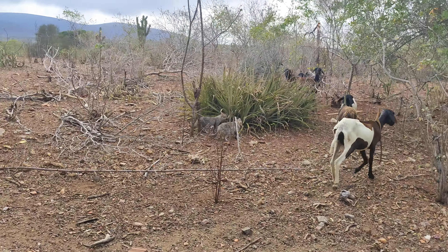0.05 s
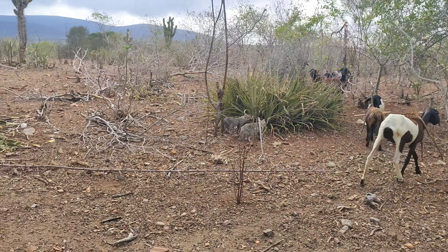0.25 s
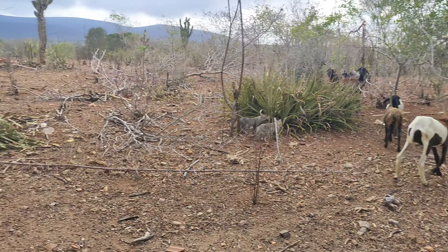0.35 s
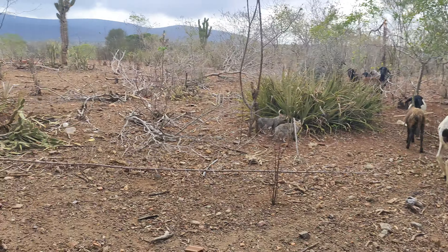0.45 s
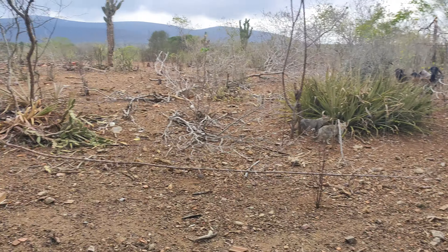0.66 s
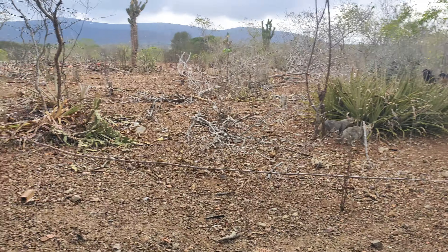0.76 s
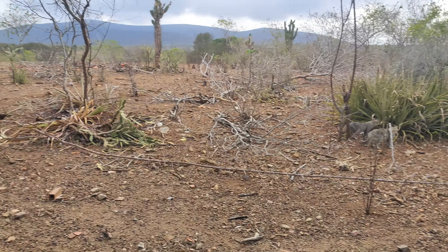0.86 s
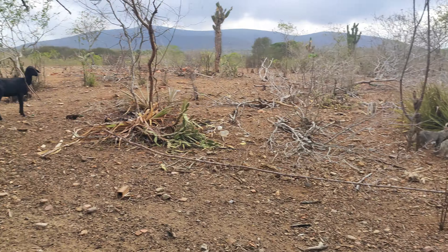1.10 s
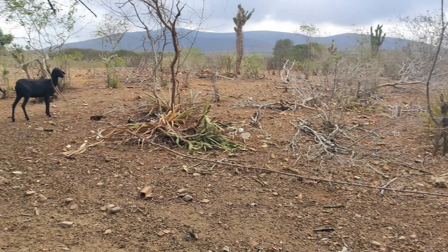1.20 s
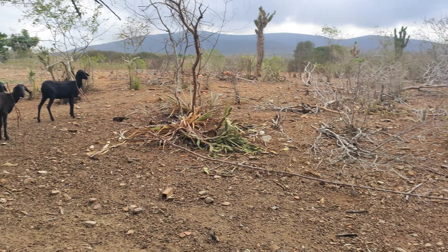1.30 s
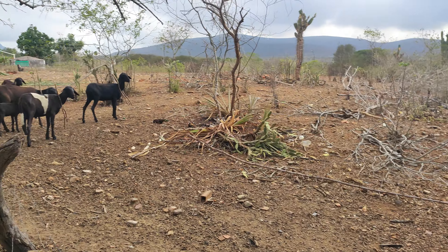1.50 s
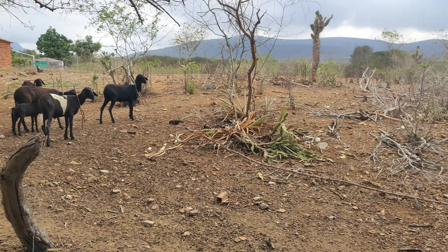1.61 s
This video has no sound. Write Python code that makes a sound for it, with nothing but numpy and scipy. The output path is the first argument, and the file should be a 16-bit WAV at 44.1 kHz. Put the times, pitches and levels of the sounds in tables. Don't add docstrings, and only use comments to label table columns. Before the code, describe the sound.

A sheep bleats once, humming then hoarse and trembling, followed by a short grunt in dry scrub

```python
import sys
import numpy as np
from scipy import signal
from scipy.fft import rfft, irfft, next_fast_len
from scipy.io import wavfile
from scipy.ndimage import uniform_filter1d, map_coordinates

SR = 44100
rng = np.random.default_rng(int(sys.argv[2]) if len(sys.argv) > 2 else 0)


def gain_from_decibels(decibels):
    exponent = np.asarray(decibels, float) / 20
    return 10 ** exponent


def unload_audio(sound):
    columns = np.transpose(np.atleast_2d(sound))
    steps = np.round(np.clip(columns, -1, 1) * 32767)
    wavfile.write(sys.argv[1], SR, steps.astype(np.int16))


N = 72765


def unit(x):
    return x / np.sqrt(np.mean(x ** 2) + 1e-20)


def along(points, hz):
    f, v = np.transpose(points)
    return np.interp(np.log(hz + 1), np.log(f + 1), v)


def curves(rows):
    s, *cols = np.transpose(rows)
    return [np.interp(np.arange(N) / SR, s, c) for c in cols]


def wobble(rate):
    knots = rng.standard_normal(int(N * 400 / SR) + 4)
    return map_coordinates(knots, [np.arange(N) * min(rate, 400) / SR])


def filtered(x, response):
    m = next_fast_len(N + SR // 2)
    return irfft(rfft(x, m) * response(np.fft.rfftfreq(m, 1 / SR)), m)[..., :N]


def noise(spectrum, channels=1):
    white = rng.standard_normal((channels, N))
    return unit(filtered(white, lambda hz: gain_from_decibels(along(spectrum, hz))))


# t/s, level/dB
STIR = [(0.0, -62.5), (0.064, -78), (0.1, -54.5), (0.182, -68), (0.376, -68), (0.412, -54.5), (.47, -60.5),
        (.53, -56.5), (0.62, -66.5), (.72, -57.5), (0.8, -54), (0.82, -50), (0.89, -60), (1.0, -63.5),
        (1.1, -56.5), (1.236, -61.5), (1.282, -67.5), (1.65, -70)]
# f/Hz, level/dB per Hz
LITTER_SPECTRUM = [(300, -23), (1000, -49), (2500, 7), (4500, 9), (7600, -98), (8900, 12), (12000, 7),
                   (16000, -1)]
# t/s, peak level/dB, f/Hz, t60/s
TWIG_SNAPS = [
    (.092, -53, 750, .15),
    (.0967, -44, 10000, .04),
    (.136, -32, 1500, .015),
    (.339, -38, 8000, .005),
    (.49, -47, 11000, .15),
    (.809, -43, 11000, .01),
    (.827, -38, 14000, .012),
    (1.515, -54, 1100, .15),
    (1.633, -50, 12000, .006),
]


def litter():
    grains_per_s, grain_spread_db, grain_db = 300, 4.5, -11
    stir_db, = curves(STIR)
    grains = rng.random(N) < grains_per_s / SR
    impacts = grains * gain_from_decibels(grain_spread_db * rng.exponential(size=N).clip(0, 3))
    crackle = unit(signal.lfilter([1], [1, -.97], impacts * noise(LITTER_SPECTRUM)[0]))
    stir = gain_from_decibels(stir_db + 2.5 + 2.8 * wobble(29.913))
    hiss = 0.29 * noise(LITTER_SPECTRUM) + 0.71 * noise(LITTER_SPECTRUM, channels=2)
    out = stir * (hiss + gain_from_decibels(grain_db) * crackle)
    t = np.arange(SR // 10) / SR
    for s, db, hz, t60 in TWIG_SNAPS:
        band = signal.butter(2, [hz * .55, min(hz * 1.6, 20000)], "bandpass", fs=SR)
        burst = unit(signal.lfilter(*band, rng.standard_normal(len(t))))
        snap = gain_from_decibels(db - 5 - 60 * t / t60) * burst
        start = round(s * SR)
        out[:, start:][:, :len(t)] += snap[:N - start]
    return out


# t/s, level/dB
SCRUB_HISS = [(0.0, -73), (.2, -73), (.942, -66), (1.2, -70.5), (1.26, -75), (1.32, -75), (1.42, -76.5),
              (1.48, -78.5), (1.53, -72.5), (1.65, -75)]
# f/Hz, level/dB per Hz
SCRUB_SPECTRUM = [(60, -0.5), (250, 0.5), (700, -12.5), (1400, -7), (2300, 3.5), (3200, -12.5), (5000, -14),
                  (8000, -27.5)]
# t/s, level/dB
BUFFETING = [(0.0, -50), (0.05, -57), (0.766, -55), (0.826, -120), (0.896, -50), (0.922, -82),
             (1.65, -62.5)]
# f/Hz, level/dB per Hz
RUMBLE_SPECTRUM = [(15, -3), (40, 0.5), (90, -1), (200, -20.5), (500, -49)]


def air():
    hiss_db, = curves(SCRUB_HISS)
    wind_db, = curves(BUFFETING)
    port_db = np.array([[0], [-4]])
    lumps = gain_from_decibels(wind_db + port_db + 4 * np.array([wobble(14), wobble(14)]))
    far = gain_from_decibels(hiss_db + 14 + 1.5 * wobble(12)) * noise(SCRUB_SPECTRUM, channels=2)
    return far + lumps * noise(RUMBLE_SPECTRUM, channels=2)


# t/s, length/s, from f/Hz, to f/Hz, level/dB
WHISTLES = [
    (0, 0.082, 2525, 2300, -59.5),
    (0.088, 0.11, 2042, 2163, -58.5),
    (.2, .1, 3250, 2610, -64),
    (.28, 0.057, 2217, 2536, -59),
    (0.312, .09, 2496, 2330, -57),
    (1.188, 0.1057, 2364, 2198, -65),
    (1.196, 0.065, 1980, 1860, -70),
    (1.297, 0.126, 2300, 2140, -62.5),
    (1.581, 0.17, 2384, 2415, -65.5),
]


def birds():
    out, t = np.zeros(N), np.arange(N) / SR
    for s, length, from_hz, to_hz, db in WHISTLES:
        u = ((t - s) / length).clip(0, 1)
        glide = (from_hz + (to_hz - from_hz) * u) * (1 + .015 * wobble(150))
        envelope = np.sqrt(np.sin(np.pi * u).clip(0))
        level = gain_from_decibels(db + 1.5 + 1.9 * wobble(110).clip(-2, 2))
        out += level * envelope * np.sin(2 * np.pi * np.cumsum(glide) / SR)
    return out


def folds(pitch_hz, rough):
    tremor, jitter, scatter_db, breath_db = .005, .11, 1.5, 1
    flap_hz, flap_depth = 52, .9
    double_from_s, double_to_s, double_depth = .435, .575, .4
    overtone_db = -17.5
    t = np.arange(N) / SR
    unsteady = 1 + tremor * wobble(60) + jitter * rough * wobble(150).clip(-2, 2)
    cycles = np.cumsum(pitch_hz * unsteady) / SR
    flap_phase = 2 * np.pi * np.cumsum(flap_hz * (1 + 0.2093 * wobble(16))) / SR
    flap = 1 + flap_depth * rough * np.sin(flap_phase)
    doubling = (t > double_from_s) & (t < double_to_s)
    flap = flap * (1 + double_depth * doubling * np.cos(np.pi * cycles))

    at = np.interp(np.arange(1, int(cycles[-1])), cycles, np.arange(N))
    i = at.astype(int)
    scatter = gain_from_decibels(scatter_db * rough[i] * rng.standard_normal(2000)[:len(i)])
    size = np.sqrt(flap[i]) * scatter * np.sqrt(SR / pitch_hz[i])
    taps = i[:, None] + np.arange(-8, 9)
    offset = taps - at[:, None]
    shape = np.sinc(offset) * np.cos(offset * np.pi / 18) ** 2
    puffs = np.bincount(taps.clip(0, N - 1).ravel(), (shape * size[:, None]).ravel(), N)

    breath = rng.standard_normal(N) * np.sqrt(flap) * 2 * np.exp(-1.5 * (cycles % 1))
    swing = flap * (np.sin(2 * np.pi * cycles) + gain_from_decibels(overtone_db) * np.cos(4 * np.pi * cycles))
    return -(puffs * (1 - 0.65 * rough) + gain_from_decibels(breath_db) * (0.14 + rough) * breath), swing


def sounding(effort_db):
    return gain_from_decibels(effort_db) * (effort_db > effort_db.min() + .1)


def throat(x, tract, low_hz, turn=-1):
    top_hz = 2810

    def response(f):
        peaks = 0
        for k, (centre, width, db) in enumerate(tract):
            damping = 1j * f * width
            peaks = peaks + turn ** k * gain_from_decibels(db) * damping / (centre * centre - f * f + damping)
        low_edge = (1j * f / (low_hz + 1j * f)) ** 2
        return peaks * low_edge / (1 + 1.2j * f / top_hz - (f / top_hz) ** 2) ** 2

    return filtered(x, response)


# t/s, pitch f/Hz, effort level/dB, roughness/0-1, mouth/0 shut-1 open
NASAL_HUM = [(.203, 171.7, -89, 0.09, .2), (.215, 173.1, -44, 0.22, 0), (.244, 150, -44, 0.22, 0),
             (.282, 149.7, -51.5, 0.23, 0.04), (.31, 181.1, -46, 0.03, 0), (.385, 205.8, -39, 0.1, 0.03),
             (.398, 224.5, -41, 0.14, 0), (.405, 262.2, -40.5, 0.38, 0.2), (.418, 254.2, -40, 0.42, 0.06),
             (.44, 299.1, -45.5, .4, 0.23), (.452, 218.5, -39, .35, 0.13), (.49, 217.7, -40, 0.38, 0.04),
             (.515, 219, -38.5, 0.4, 0.15), (.578, 216, -38.5, 0.15, 0.1)]
# t/s, pitch f/Hz, effort level/dB, roughness/0-1, mouth/0 shut-1 open
HOARSE_CRY = [(0.585, 214.8, -36.5, 0.1, 0.52), (.617, 233.4, -37.5, 0, 0.22), (.621, 263, -41.5, .7, 0.84),
              (.654, 280, -41.5, 0.52, 1), (.657, 286.2, -33.5, 0.16, 0.92), (.668, 274.2, -39, 0.13, 1),
              (0.679, 280, -35, 0.2, 1), (.698, 276, -35, 0.2, 1), (.71, 263.8, -35.5, .12, 1),
              (.734, 269.3, -38, 0.14, 1), (.756, 294.6, -33.5, .08, 1), (.766, 291.9, -38, 0.68, 1),
              (.795, 280.2, -35.5, 0.7, 0.98), (0.806, 275.6, -41.5, 0.58, 1),
              (.822, 276.2, -37.5, 0.63, 1), (.85, 285.3, -37, 0.56, 0.99)]
# t/s, pitch f/Hz, effort level/dB, roughness/0-1, mouth/0 shut-1 open-2 wide
TREMBLING_END = [(.862, 303.3, -37.5, .1, 0.63), (.882, 293.9, -37.5, 0.048, 1.04),
                 (.892, 279.6, -36.5, 0.047, 1.27), (.928, 264.1, -36.5, 0.024, 1.61),
                 (.953, 243.3, -36, .01, 2.03), (.976, 254.4, -38, .02, 1.5),
                 (1.002, 253.6, -37.5, .02, 1.95), (1.03, 264.7, -36, 0.032, 1.85),
                 (1.049, 259.6, -37.5, 0.032, 1.8), (1.069, 241.4, -36.5, .03, 1.64),
                 (1.084, 241.4, -36.5, 0.022, 1.65), (1.104, 247, -39, 0.012, 1.6),
                 (1.12, 234.2, -35.5, 0.099, 1.8), (1.134, 215.1, -37, .2, 2),
                 (1.155, 175.8, -39.5, 0.1, 2.1), (1.161, 168, -42, 0.24, 0),
                 (1.19, 163.3, -59.5, 0.45, 0.33), (1.205, 157, -94, 0.45, 0)]
# f/Hz, width/Hz, level/dB
NOSE_TRACT = [(775, 180, -7.5), (1316, 243, -12), (1880, 240, -19)]
# f/Hz, width/Hz, level/dB
MOUTH_TRACT = [(775, 95, 4), (1430, 260, -6), (1997, 276, -4), (2300, 220, -2.5), (3520, 330, -32)]
# f/Hz, width/Hz, level/dB
WIDE_TRACT = [(747.6, 111, 1), (990, 392, -23), (2000, 290, -5.5), (2272, 215, -2), (3430, 230, -15.5)]
# f/Hz, width/Hz, level/dB
LIPS_TRACT = [(660, 120, 0.5), (1320, 400, 2), (2230, 200, -13)]


def bleat():
    tract_low_hz = 378
    part_from_s, part_to_s, part_db = 0.5904, .619, 17.5
    chest_db, chest_open_db = 6.5, -5
    valley_hz, valley_wide_hz, valley_db = 1380, 150, -1.5
    dip_hz, dip_wide, dip_depth = 450, .6, .08
    body_low_hz = 135

    pitch, effort_db, rough, mouth = curves(NASAL_HUM + HOARSE_CRY + TREMBLING_END)
    t = np.arange(N) / SR
    puffs, swing = sounding(effort_db) * folds(pitch, rough.clip(0, 1))
    part = np.clip(np.minimum(t - part_from_s, part_to_s - t) / .003, 0, 1)
    parting = gain_from_decibels(part_db) * throat(puffs * part, LIPS_TRACT, tract_low_hz, turn=0.97)
    puffs = puffs * (1 - part)
    chest = swing * gain_from_decibels(chest_db + (chest_open_db - chest_db) * mouth.clip(0, 1))
    ways = 0
    for k, tract in enumerate([NOSE_TRACT, MOUTH_TRACT, WIDE_TRACT]):
        share = (1 - abs(mouth - k)).clip(0)
        ways = ways + gain_from_decibels(20) * throat(puffs * share, tract, tract_low_hz)

    def radiation(f):
        valley = gain_from_decibels(valley_db * np.exp(-((f - valley_hz) / valley_wide_hz) ** 2))
        stiffness, damping = dip_hz ** 2 - f * f, 1j * f * dip_hz * dip_wide
        dip = (stiffness + damping * dip_depth) / (stiffness + damping)
        return dip * valley * f ** 4 / (f ** 4 + body_low_hz ** 4.0)

    return filtered(chest + ways - parting, radiation)


# t/s, pitch f/Hz, effort level/dB, roughness/0-1
COUGHS = [
    [(1.338, 198, -71.5, 0.2), (1.343, 247, -45.5, 0.06), (1.35, 326, -51.5, 0), (1.357, 477, -49, 0.1),
     (1.366, 455, -45.5, 0.38), (1.378, 393, -53.5, .5), (1.38, 400, -65, 0.44)],
    [(1.378, 332, -64.5, 0.08), (1.381, 335, -59, 0), (1.3865, 333.5, -40, 0.06), (1.3875, 219.6, -43, 0),
     (1.397, 210, -41, 0.08), (1.403, 195, -50, 0), (1.406, 199, -70, 0)],
]
# f/Hz, width/Hz, level/dB
GULLET_TRACT = [(203, 70, -0.65), (616, 420, -1.8), (1480, 200, 0)]


def grunt():
    out = 0
    for rows in COUGHS:
        pitch, effort_db, rough = curves(rows)
        started = np.arange(N) / SR > rows[0][0]
        puffs, _ = folds(pitch * started, rough.clip(0, 1))
        out = out + puffs * sounding(effort_db)
    return -gain_from_decibels(17) * throat(out, GULLET_TRACT, low_hz=110)


# f/Hz, phase/rad
PORT_LEAD = [(0, 0), (300, -.2), (1460, -2.9), (3360, -9.8), (9390, -30), (16000, -50)]
# f/Hz, left over right level/dB
PORT_TILT = [(60, -1.5), (400, 0.5), (800, 0.5), (1300, 4), (2200, 11.5), (4400, 0.5), (9000, -9.5),
             (15000, 2)]


def ports(x):
    f, turn = np.transpose(PORT_LEAD)
    side = np.array([[.5], [-.5]])
    return filtered(x, lambda hz: gain_from_decibels(side * along(PORT_TILT, hz)) * np.exp(1j * side * np.interp(hz, f, turn)))


def ground(x):
    t60_s, low_hz = 0.045, 650
    t = np.arange(SR // 4) / SR
    tail = rng.standard_normal((2, len(t))) * gain_from_decibels(-60 * t / t60_s) * (t > .002)
    wet = signal.fftconvolve(x, tail / np.linalg.norm(tail[0]), axes=1)[:, :N]
    return filtered(wet, lambda f: (1j * f / (low_hz + 1j * f)) ** 2)


def gate(x):
    over_db, depth_db = -.5, -40
    hz, _, z = signal.stft(x, SR, nperseg=2048, noverlap=1536)
    power = uniform_filter1d((abs(z) ** 2).mean(0), size=3, axis=1)
    narrow = uniform_filter1d(power, size=7, axis=0)
    wide = uniform_filter1d(power, size=40, axis=0)
    shut = (narrow < wide * gain_from_decibels(2 * over_db)) & (hz[:, None] > 3500)
    gain = np.where(shut, gain_from_decibels(depth_db), 1)
    return signal.istft(z * gain, SR, nperseg=2048, noverlap=1536)[1][:, :N]


def scene():
    near = ports(bleat() + grunt() + litter() + birds())
    return near + gain_from_decibels(-7) * ground(near) + air()


def band_limit(x):
    return signal.sosfilt(signal.butter(12, 15910, fs=SR, output="sos"), x)


def record(dry):
    top_hz = 15800
    mix = filtered(gate(dry), lambda hz: hz < top_hz)
    return band_limit(mix)


dry = scene()
out = record(dry)
unload_audio(out)
```